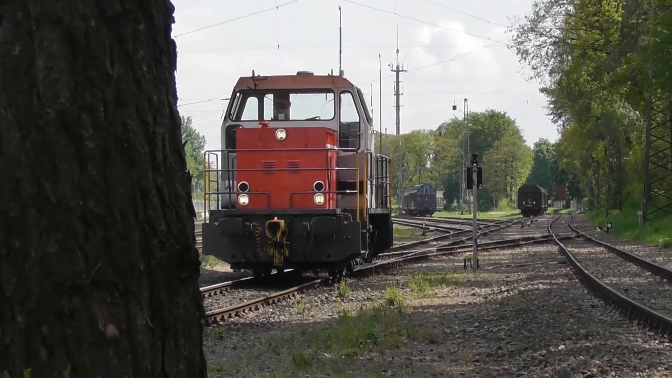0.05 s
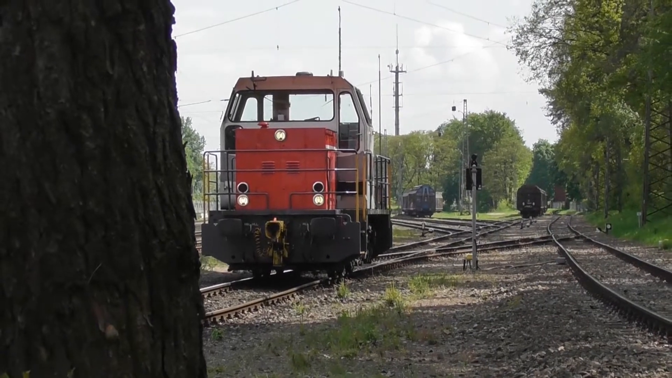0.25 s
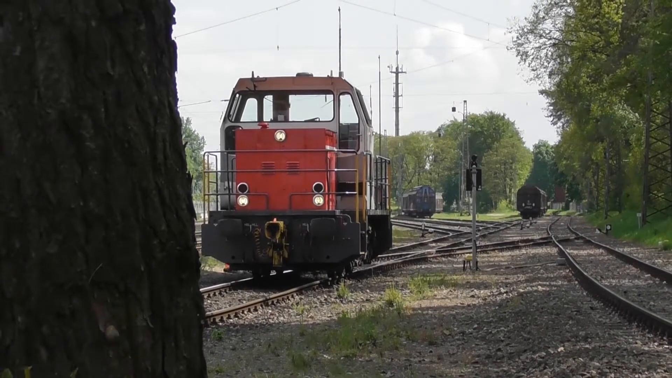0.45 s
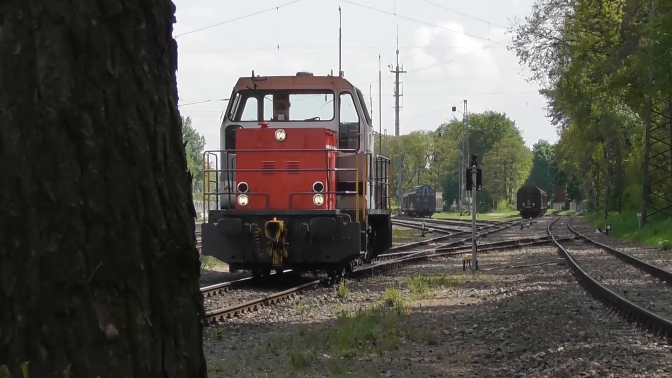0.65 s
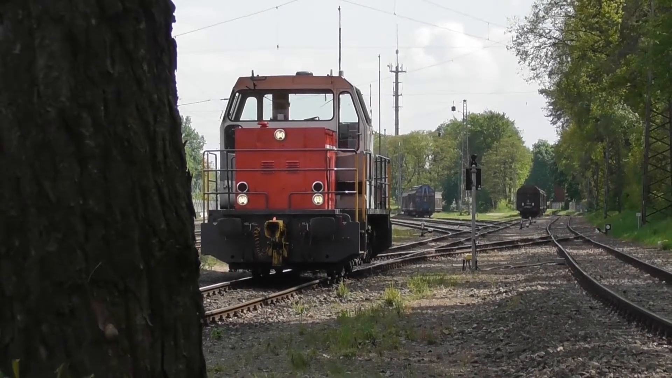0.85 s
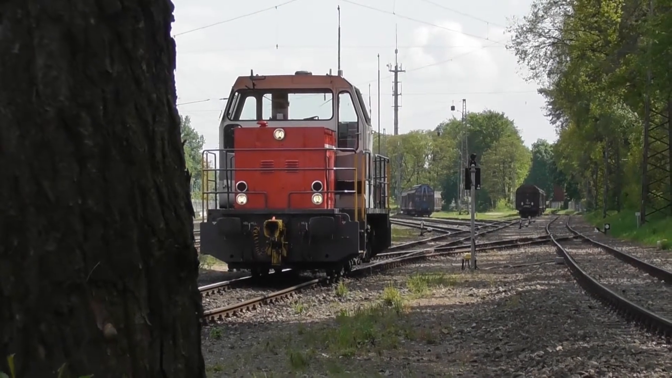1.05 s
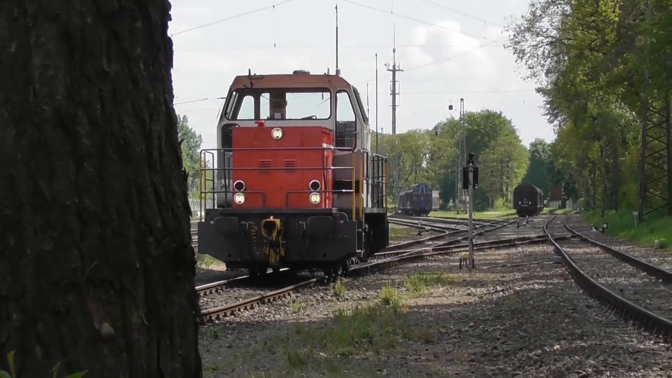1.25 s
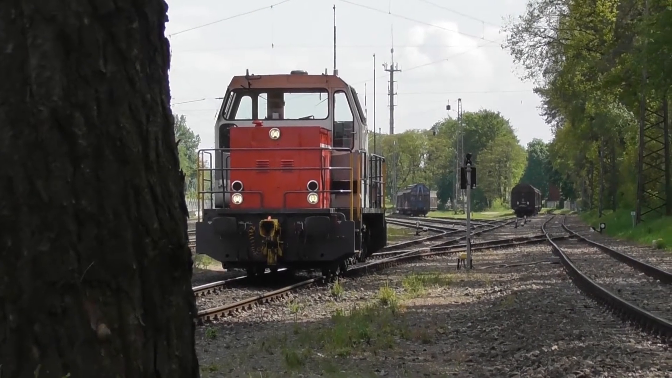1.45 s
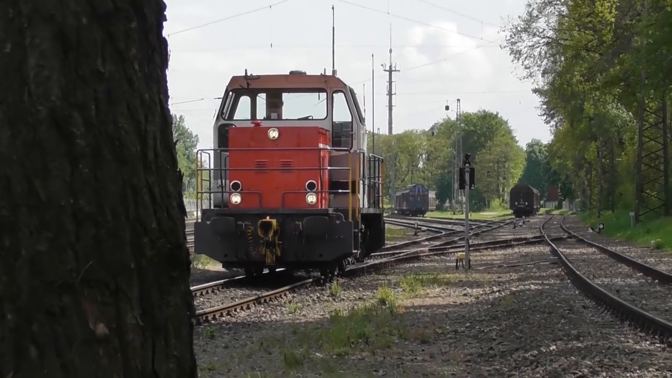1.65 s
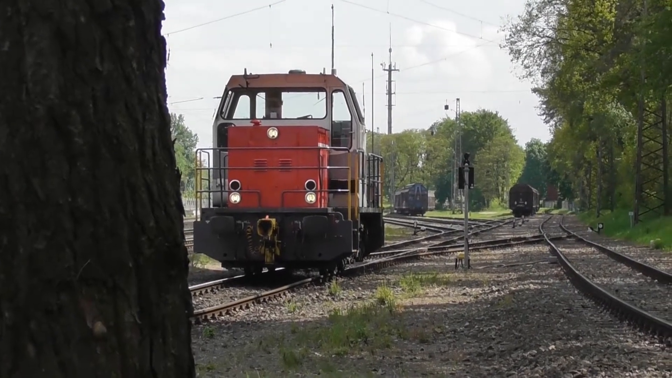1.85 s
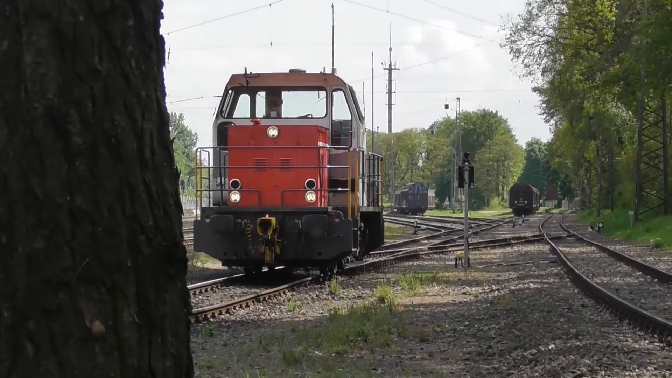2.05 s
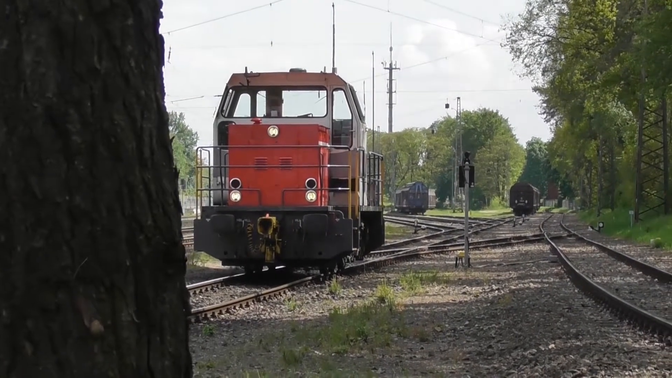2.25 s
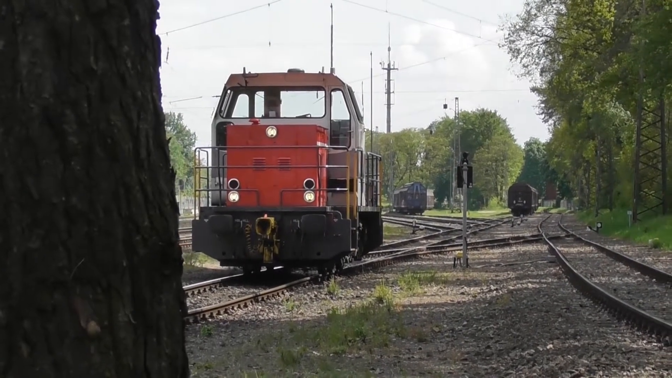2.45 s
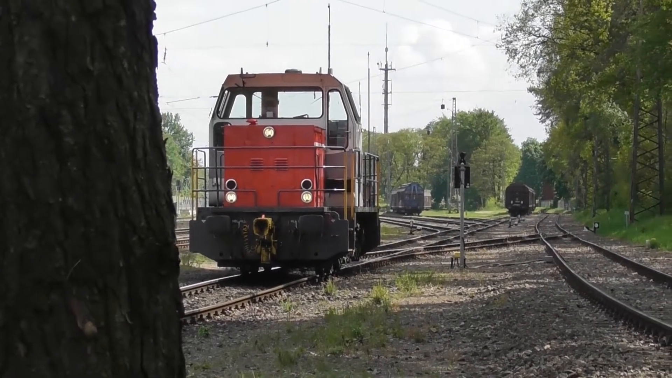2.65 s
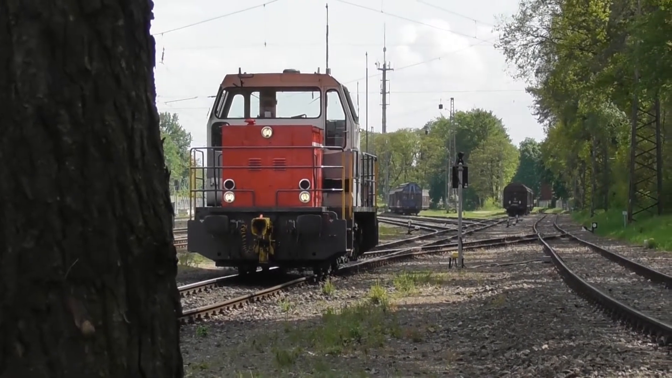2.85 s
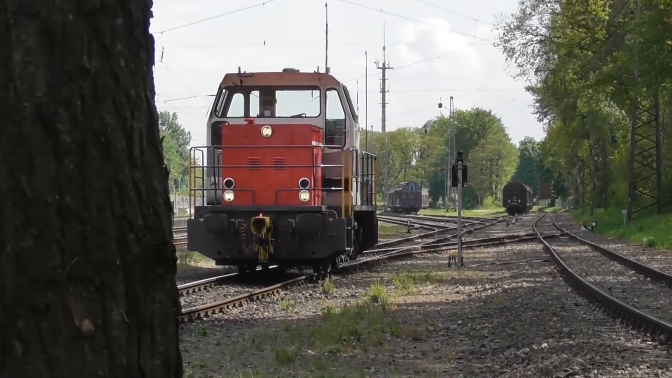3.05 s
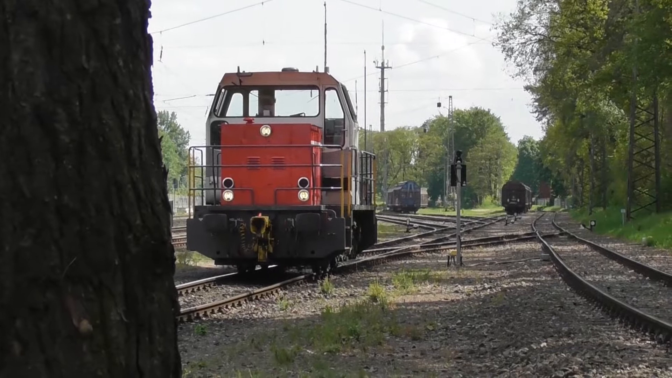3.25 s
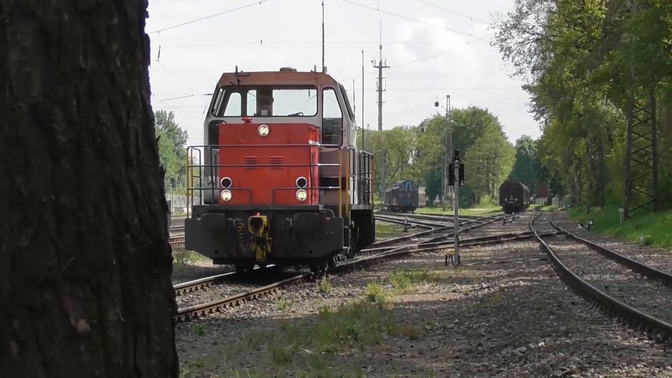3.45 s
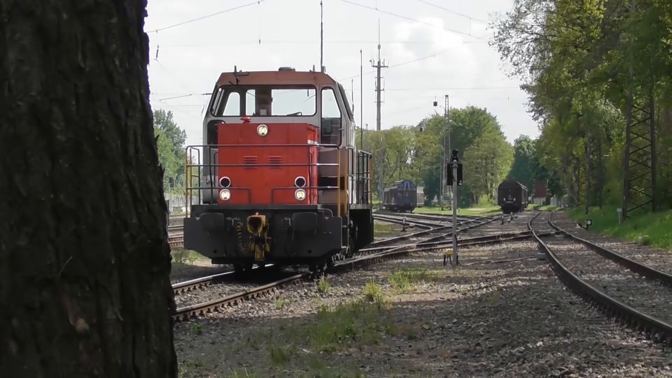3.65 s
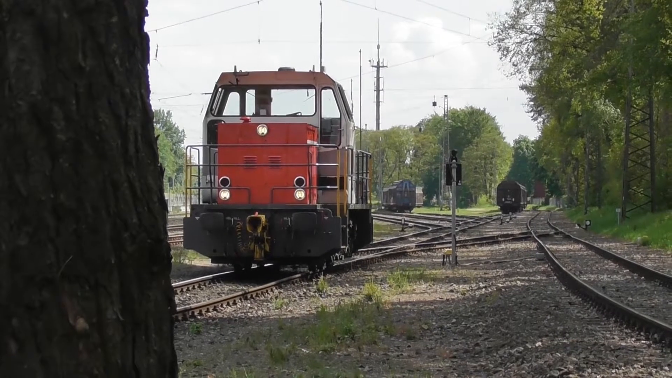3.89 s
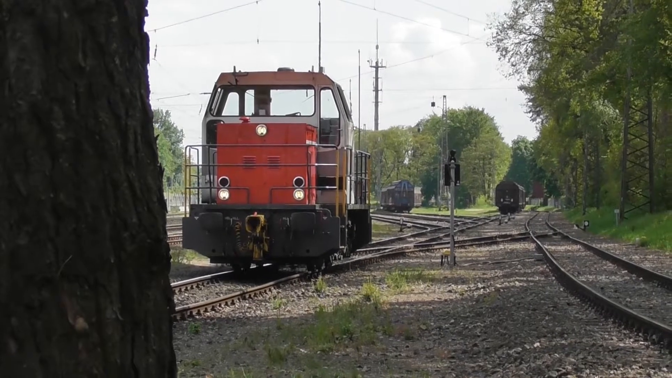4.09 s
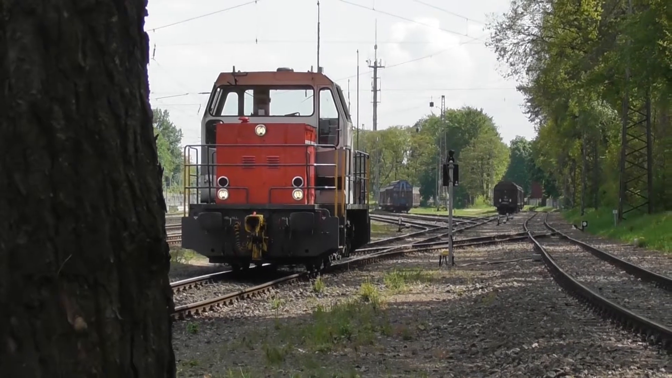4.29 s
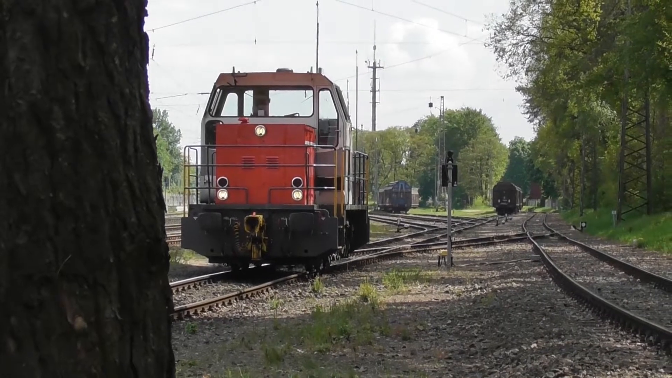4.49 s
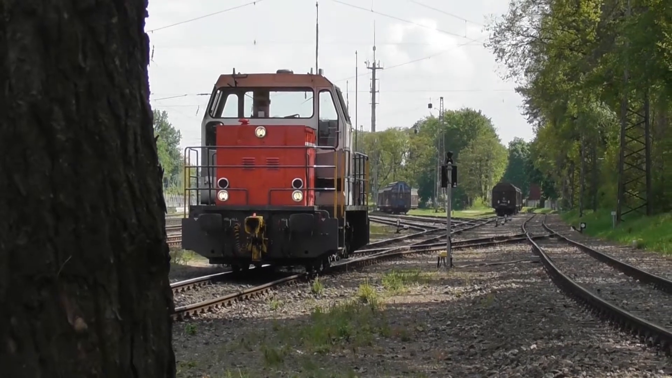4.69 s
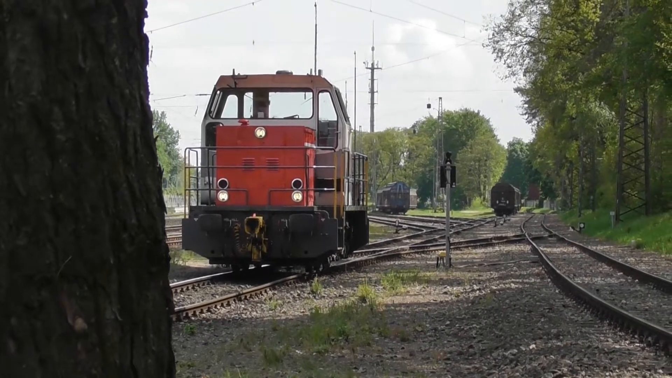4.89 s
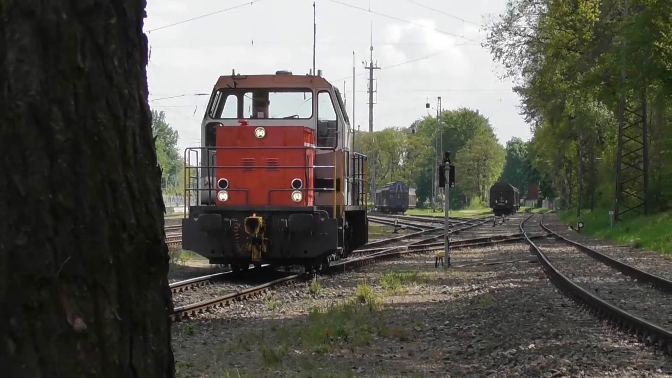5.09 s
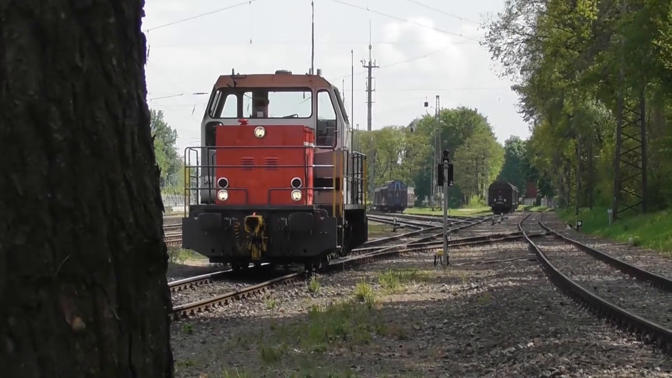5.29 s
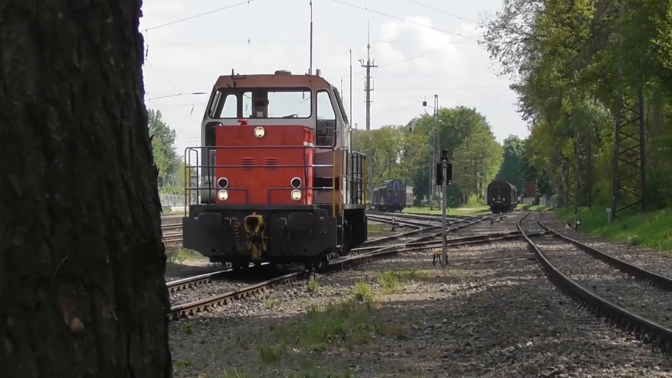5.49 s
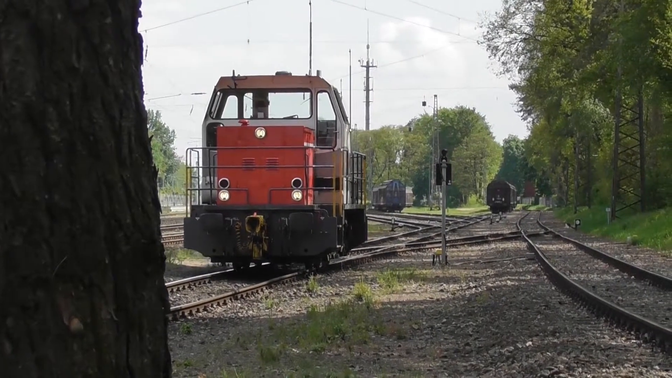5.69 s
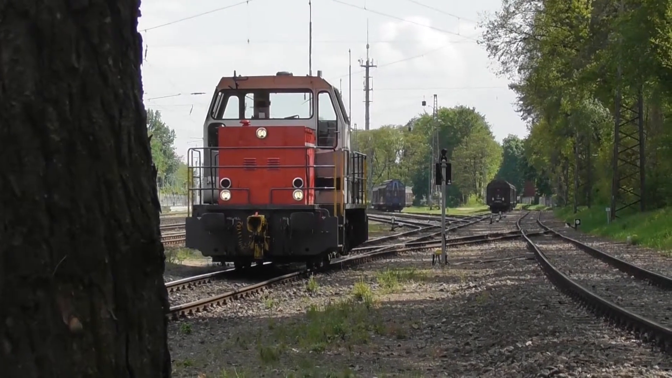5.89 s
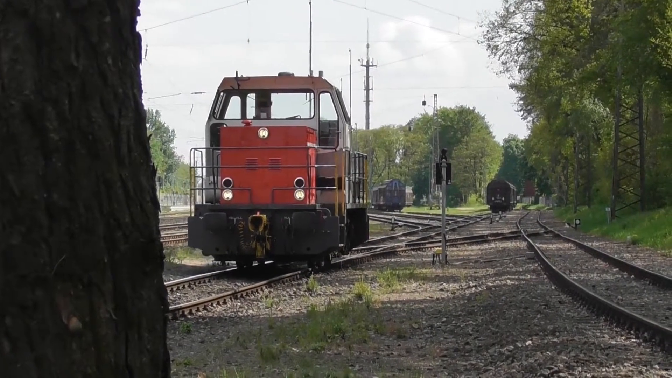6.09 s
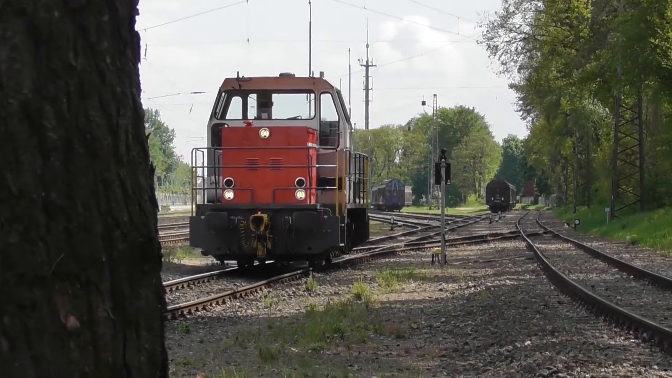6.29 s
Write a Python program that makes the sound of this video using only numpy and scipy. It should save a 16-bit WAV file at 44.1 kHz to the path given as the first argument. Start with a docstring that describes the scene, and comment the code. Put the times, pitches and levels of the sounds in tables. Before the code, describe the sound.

Brake air hisses off over a throbbing diesel locomotive idle; the engine climbs twice, a bird whistles briefly, and the deep exhaust drone swells.

```python
"""In a rail yard, a diesel shunter idles, then revs up in two steps and pulls away.
Its exhaust is a set of tones locked to the engine, which boom as they sweep through the pipe resonance.
Clatter and roar are shaped noise that pulses with the engine and grows with its speed.
Brake air is hissing noise that dies away, with one more puff; a bird whistles from the trees.
A faint steady hiss lies behind it all."""
import sys
import numpy as np
from scipy import signal
from scipy.fft import rfft, irfft
from scipy.io import wavfile

SR = 44100
rng = np.random.default_rng(int(sys.argv[2]) if len(sys.argv) > 2 else 0)


def bounce(signal):
    """Save signal as a 16-bit WAV file at the path given by the first command-line argument."""
    frames = np.transpose(np.atleast_2d(signal))
    limited = np.clip(frames, -1, 1)
    pcm = np.round(limited * 32767).astype(np.int16)
    wavfile.write(sys.argv[1], SR, pcm)


N = 279153
TIME = np.arange(N) / SR  # seconds
BINS = np.fft.rfftfreq(N, 1 / SR)  # Hz
IDLE_HZ = 4.78  # four-stroke engine cycles a second; "order k" is a tone at k times the cycle rate

# Throttle steps. Each row: start in seconds, speed gained in engine cycles a second,
# time to gather speed in seconds, steepness of the S-curve.
NOTCHES = [(1.157, 1.528, .606, 1.834), (4.025, 3.167, 1.331, 1.615)]
# How the exhaust pipe colours a tone. Each row: frequency in Hz, level in dB.
PIPE = [(10, -29), (28, -25), (42, -6), (56, 1.5), (68, 2), (86, -7), (115, -15.5), (170, -9.5), (205, -16),
        (250, -9.5), (300, -14.5), (340, -15), (600, -26), (900, -35)]


def gain_of(db):
    """Turns decibels into a gain."""
    return 10 ** (np.asarray(db) / 20)


def evened(x):
    """Scales a signal to an average strength (rms) of 1."""
    return x / np.sqrt(np.mean(x ** 2) + 1e-20)


def read(points, hz):
    """Reads a table of points with straight lines on a log-frequency axis."""
    f, value = np.transpose(points)
    return np.interp(np.log(hz + 1), np.log(f + 1), value)


def drift(rate_hz):
    """Random wandering of rms 1, mostly slower than rate_hz."""
    return evened(irfft(rfft(rng.standard_normal(N)) / (1 + (BINS / rate_hz) ** 4), N))


def noise(colour_db, same):
    """Two-channel noise of rms 1 with a given spectrum and left-right likeness (1 = identical)."""
    left, other = rfft(rng.standard_normal((2, N)))
    same = np.clip(same, 0, 1)
    right = same * left + np.sqrt(1 - same ** 2) * other
    return evened(irfft(np.array([left, right]) * gain_of(colour_db), N))


def bumps(resonances):
    """The dB curve of a set of resonances; each bump has nearly gone one width from its centre."""
    return sum(db * np.exp(-2 * ((BINS - hz) / width) ** 2) for hz, width, db in resonances)


def panned(x, lean_db):
    """Makes the left channel louder than the right by lean_db."""
    return x * gain_of(np.array([[.5], [-.5]]) * lean_db)


def governor():
    """Engine cycles a second: each notch adds speed along an S-curve, and the load slowly drags it down."""
    droop_hz_per_s = .07
    cycle_hz = IDLE_HZ - droop_hz_per_s * np.maximum(TIME - NOTCHES[0][0], 0)
    for start, rise, lag, steepness in NOTCHES:
        age = np.maximum(TIME - start, 0)
        cycle_hz = cycle_hz + rise * (1 - np.exp(-(age / lag) ** steepness))
    return cycle_hz


def exhaust(cycle_hz, turns, boom_db, throb_db):
    """Strong orders sweep through a resonance, over weak ones because no two cylinders fire alike."""
    # The pipe's boom resonance. Each row: frequency in Hz, level in dB.
    boom_curve = [(30, -38), (37, -42), (42, -43.5), (47, -32), (52, -23.5), (57, -17.8), (67, -16.5),
                  (73, -24.5), (80, -28), (92, -28), (110, -37.5), (128, -33)]
    # The loud orders. Each row: order, strength in dB added to the resonance.
    boom_orders = dict([(6, 3), (9, 0), (15, -10.5)])
    boom = np.zeros(N)
    for k, db in boom_orders.items():
        level_db = boom_db + db + read(boom_curve, k * cycle_hz)
        boom += gain_of(level_db) * np.sqrt(2) * np.cos(2 * np.pi * (k * turns + rng.random()))
    boom *= gain_of(0.12 * drift(10))

    throb = np.zeros(N)
    for k in range(1, 91):
        if k not in boom_orders:
            phase, uneven = rng.random(2)
            level_db = read(PIPE, k * cycle_hz) + 2.4 * uneven
            throb += gain_of(level_db) * np.cos(2 * np.pi * (k * turns + phase))
    throb = gain_of(throb_db + drift(9.3)) * evened(throb)

    rumble_colour_db = -40 * abs(np.log(np.maximum(BINS, 1) / 62))  # peaks at 62 Hz
    rumble = gain_of(throb_db - 4.5) * noise(rumble_colour_db, 0.43)
    return boom + throb + rumble


def chug(cycle_hz, turns, speed):
    """At idle one cylinder fires harder and thumps the pipe once a cycle, fading as speed grows."""
    thump_hz, swell_s, offset = 62, 0.019, 0.547  # tone, time to its peak, place in the cycle (0 to 1)
    age = (turns - offset) % 1 / cycle_hz  # seconds since the last thump
    swell = age / swell_s * np.exp(1 - age / swell_s)
    thump = swell * np.sin(2 * np.pi * thump_hz * age)
    return gain_of(-31.5 + 2 * drift(4.7)) * np.exp(-speed / 0.77) * thump


def roar(turns, roar_db, speed):
    """Combustion clatter and rushing gas, pulsing with the twelve cylinders and ringing the hood."""
    # Noise colour at idle and at speed. Each row: frequency in Hz, relative level in dB per Hz.
    idle_colour = [(30, -29), (90, 2), (120, -9.5), (168, -1), (220, -1), (400, -5.5), (590, -2.5),
                   (780, -5.5), (1150, -11.5), (1550, -20.5), (2150, -21.5), (2950, -25.5), (3500, -25.5),
                   (4100, -32)]
    fast_colour = [(30, -22), (90, 2.5), (135, -2.5), (200, 3), (260, 0.3), (400, -3), (560, -1.5),
                   (760, -5), (1130, -2.2), (1480, -17.5), (2100, -19), (2850, -23.5), (3300, -23.5),
                   (3750, -18.5), (4100, -24.5)]
    # Resonances of the hood panels. Each row: frequency in Hz, width in Hz, boost in dB.
    panels = [(262, 23, 3), (526, 19, 2), (640, 44, 0.5), (773, 77, -2), (902, 60, 4), (1055, 87, 2),
              (1440, 17, -5), (1883, 107, 3.5), (2150, 79, 5.5), (2650, 83, 2), (3410, 99, 4)]
    # Likeness of the two channels. Each row: frequency in Hz, likeness from 0 to 1.
    likeness = [(100, .72), (250, .8), (500, .89), (1000, .95), (2000, .97), (4000, .98)]
    # Left-right balance. Each row: frequency in Hz, left minus right in dB.
    balance = [(100, -2), (200, -3.2), (380, -2.7), (700, -1.3), (1300, -.6), (4000, -.2)]
    muffle_hz = 4250  # a steep cut above this
    hood_db = bumps(panels) - 10 * np.log10(1 + (BINS / muffle_hz) ** 60)
    same = read(likeness, BINS)
    slow = noise(read(idle_colour, BINS) + hood_db, same)
    fast = noise(read(fast_colour, BINS) + hood_db, same)
    blend = np.sqrt(1 - speed) * slow + np.sqrt(speed) * fast

    firing = np.cos(2 * np.pi * 12 * turns)  # twelve pulses a cycle
    slow_pulse = np.cos(2 * np.pi * 3 * turns)  # three pulses a cycle
    pulsing = gain_of(0.39 * firing + 0.26 * slow_pulse + 0.12 * drift(15))
    sound = gain_of(roar_db) * evened(pulsing * blend)
    return irfft(panned(rfft(sound), read(balance, BINS)), N)


def hum(cycle_hz, turns, roar_db):
    """Upper orders glide with the engine and swell as they cross the pipe's resonances."""
    # Orders that sing in the pipe. Each row: order, level before the pipe in dB relative to the roar.
    hum_orders = [(12, -16), (18, -3), (28, -2), (30, -3), (33, -1.5), (36, -0.5), (40, -7), (43, -5.5),
                  (54, -1)]
    lines = np.zeros(N)
    for k, db in hum_orders:
        level_db = db + read(PIPE, k * cycle_hz) + 2.5 * drift(1.7)
        lines += gain_of(level_db) * np.cos(2 * np.pi * (round(k) * turns + rng.random()))
    return gain_of(roar_db) * lines


def idle_tone(speed):
    """A wavering hum near 262 Hz that fades out as the engine leaves idle."""
    phase = 2 * np.pi * np.cumsum(262 + 0.57 * drift(2.8)) / SR
    level = gain_of(-52.5 + 0.72 * drift(4.5)) * np.exp(-speed / 0.33)
    return level * np.sqrt(2) * np.sin(phase)


def intake_rush(speed):
    """Air rushing into the engine: noise centred on 6 kHz that grows steeply with speed."""
    colour_db = -25 * abs(np.log((BINS + 1) / 6000))
    return gain_of(-65) * speed ** 3 * noise(colour_db, 1.0)


def brake_air():
    """Air hisses through a ringing nozzle as its pressure falls; a valve adds one short puff."""
    # Colours of the leak and the puff. Each row: frequency in Hz, relative level in dB per Hz.
    air_colour = [(1200, -24), (2200, -4), (3000, -6), (4000, -2.5), (4500, -12), (5400, -7.5),
                  (6400, -13.5), (7250, -6), (8000, -7.5), (8500, -2), (9100, -9), (11200, -12),
                  (15000, -24)]
    puff_colour = [(6000, -27), (6700, -6), (7150, -6), (7600, -8), (8000, -4), (8400, -32)]
    # Resonances of the nozzle. Each row: frequency in Hz, width in Hz, boost in dB.
    nozzle = [(5380, 62, 9), (5700, 55, 9), (7100, 62, 3), (7660, 50, 6), (8020, 83, 7), (8300, 65, 5.4),
              (8680, 60, 4), (8900, 100, 6), (10530, 50, 6), (11090, 60, 7)]
    air_db, air_fall_db_per_s = -51.5, 4.5  # level at the start, then a steady loss of pressure
    shut_s, shut_db_per_s, seep_db = 2.15, 20, -79  # the valve closes to a faint seep
    leak_db = air_db - air_fall_db_per_s * TIME - shut_db_per_s * np.maximum(TIME - shut_s, 0)
    leak_gain = np.hypot(gain_of(leak_db), gain_of(seep_db))
    leak = leak_gain * noise(read(air_colour, BINS) + bumps(nozzle), 0.99)

    # The shrill edge at full pressure
    spurt_db, spurt_fall_db_per_s, spurt_hz, spurt_width_hz = -54, 25, 8480, 330
    spurt_colour_db = -20 * np.log10(1 + ((BINS - spurt_hz) / spurt_width_hz) ** 2)
    spurt = gain_of(spurt_db - spurt_fall_db_per_s * TIME) * noise(spurt_colour_db, 0.72)

    # The puff opens, holds and closes with straight edges
    puff_s, puff_length_s, puff_edge_s, puff_db = 2.38, .3, 0.078, -58.5
    to_nearest_end = np.minimum(TIME - puff_s, puff_s + puff_length_s - TIME)
    opening = np.clip(to_nearest_end / puff_edge_s, 0, 1)
    puff = gain_of(puff_db) * opening * noise(read(puff_colour, BINS), 0.83)
    return leak + spurt + puff


def bird():
    """Thin whistles that scoop up to a held pitch and bend at the end, scattered by the trees."""
    # The notes. Each row: start in seconds, length in seconds, held pitch in Hz,
    # scoop up to it in Hz, drop at the end in Hz (negative rises), level at the start in dB.
    notes = [(3.525, .055, 6600, 80, 0, -65), (3.68, .045, 6800, 0, 450, -61),
             (3.797, .097, 4490, 1200, 200, -49), (3.937, 0.1, 4440, 404, 28, -57.5),
             (4.07, .07, 4480, 50, 30, -61), (4.322, .03, 5130, 900, 0, -64),
             (4.351, 0.031, 3800, 50, -120, -47), (4.39, .09, 5000, 50, 30, -74)]
    scoop_s, note_fade_db = .016, -7  # every note scoops up quickly and fades
    echo_s, echo_db = 1.4, -5  # time for the echo to fall by 60 dB, and its level
    song = np.zeros(N)
    for start, length, held_hz, scoop_hz, drop_hz, db in notes:
        on = (TIME > start) & (TIME < start + length)
        age = TIME[on] - start
        hz = held_hz - scoop_hz * np.exp(-age / scoop_s) - drop_hz * (age / length) ** 4
        whistle = np.sqrt(2) * np.sin(2 * np.pi * np.cumsum(hz) / SR)
        soft_ends = signal.windows.tukey(len(hz), .2)
        song[on] += gain_of(db + note_fade_db * age / length) * whistle * soft_ends
    trees = rng.standard_normal(SR) * gain_of(-60 * TIME[:SR] / echo_s)
    echo = signal.fftconvolve(song, trees / np.linalg.norm(trees))[:N]
    return song + gain_of(echo_db) * echo


def background_hiss():
    """Steady noise, mostly treble, that differs more between the channels the higher it is."""
    # Colour of the hiss. Each row: frequency in Hz, relative level in dB per Hz.
    hiss_colour = [(20, -60), (3000, -26), (4600, -4), (6200, -6.5), (8300, 0.5), (10000, 0), (13000, 0),
                   (16000, -1.5)]
    # Likeness of the two channels. Each row: frequency in Hz, likeness from 0 to 1.
    hiss_likeness = [(4000, 1), (6000, 1), (8000, 0.75), (12000, 0.32)]
    return gain_of(-56.5) * noise(read(hiss_colour, BINS), read(hiss_likeness, BINS))


def scene():
    """Speed, fuel and strain drive exhaust, roar and intake rush; air, bird and hiss lie on top."""
    # Balance of the exhaust as the locomotive rolls forward.
    # Each row: time in seconds, left minus right in dB.
    exhaust_pan = [(1.1, -8.5), (1.7, -5), (2.3, -5.5), (3.05, 1), (4.8, 0.5), (5.7, -0.1)]
    fuel_rise_s = 0.43  # the fuel comes on this fast at the first notch
    cycle_hz = governor()
    turns = np.cumsum(cycle_hz) / SR  # engine cycles so far
    speed = (cycle_hz - cycle_hz.min()) / np.ptp(cycle_hz)  # 0 slowest, 1 fastest
    octaves = np.log2(cycle_hz / IDLE_HZ)
    idling = 1 - np.clip((TIME - NOTCHES[0][0]) / fuel_rise_s, 0, 1)
    acceleration = np.gradient(cycle_hz)
    strain = acceleration / acceleration.max()

    # Levels in dB: softer with the fuel off, louder under strain and with each octave of speed
    boom_db = -14.5 * idling + 1 * strain
    throb_db = -40.5 - 5.5 * idling + 3.5 * strain + 5 * octaves
    approach_db = 0.4823 * TIME  # the roar grows as the locomotive rolls nearer
    roar_db = -38 + 0.38 * strain + 6 * octaves + approach_db

    stack = exhaust(cycle_hz, turns, boom_db, throb_db) + chug(cycle_hz, turns, speed)
    stack = panned(stack, np.interp(TIME, *np.transpose(exhaust_pan)))
    tones = panned(hum(cycle_hz, turns, roar_db) + idle_tone(speed), -6.0)
    engine = stack + tones + roar(turns, roar_db, speed) + intake_rush(speed)
    return engine + brake_air() + bird() + background_hiss()


def record(dry):
    """A low-pass filter takes away the treble above 15.7 kHz."""
    low_pass = signal.firwin(511, 15700, window=("kaiser", 9), fs=SR)
    return signal.oaconvolve(dry, low_pass[None], "same")


dry = scene()
out = record(dry)
bounce(out)
```